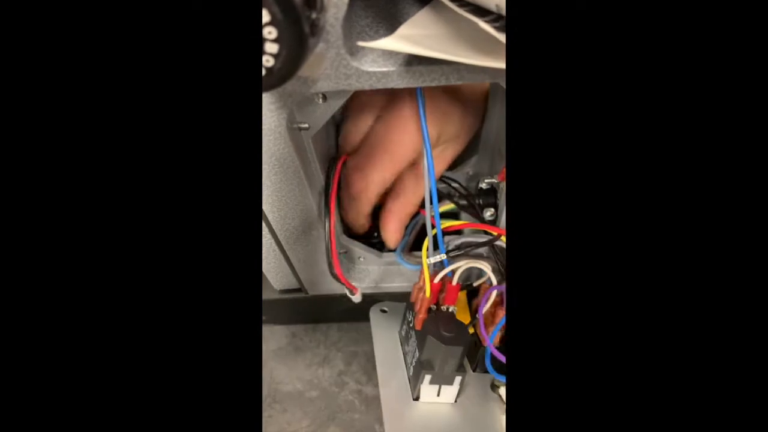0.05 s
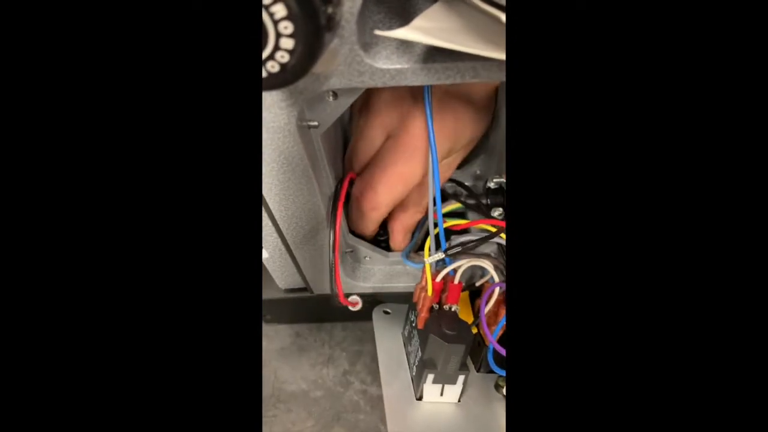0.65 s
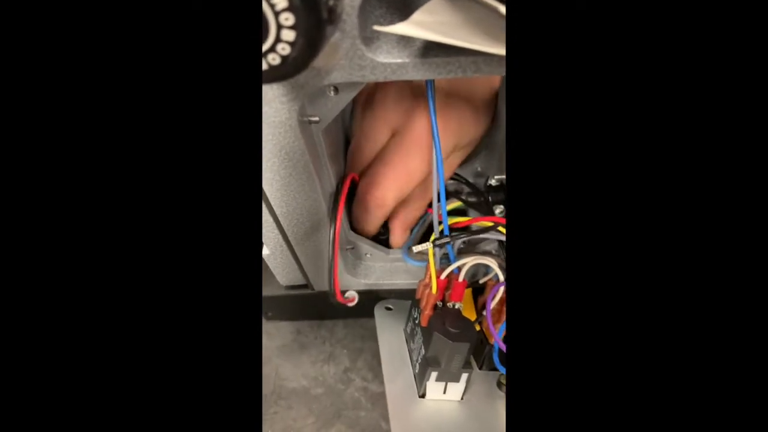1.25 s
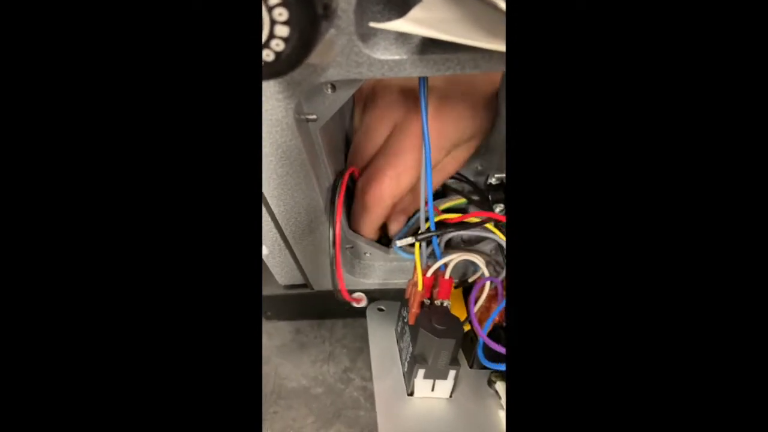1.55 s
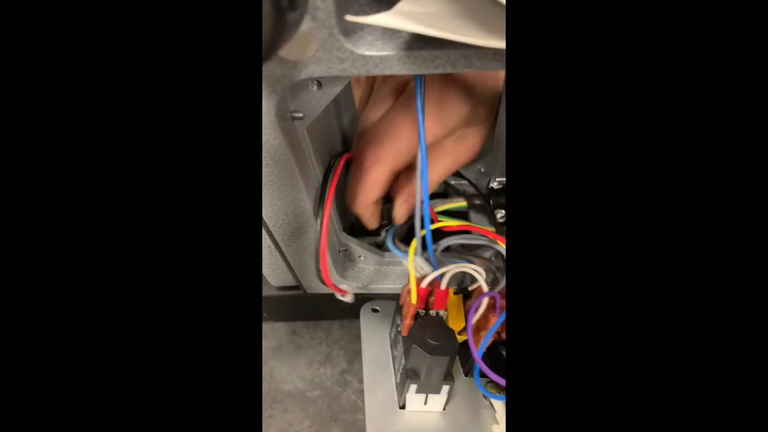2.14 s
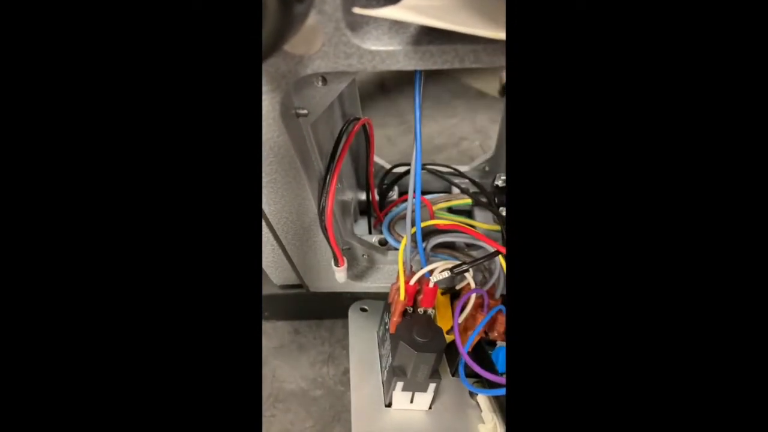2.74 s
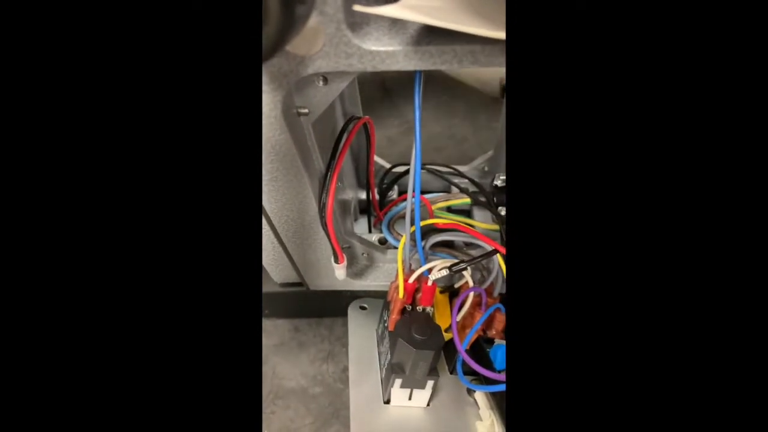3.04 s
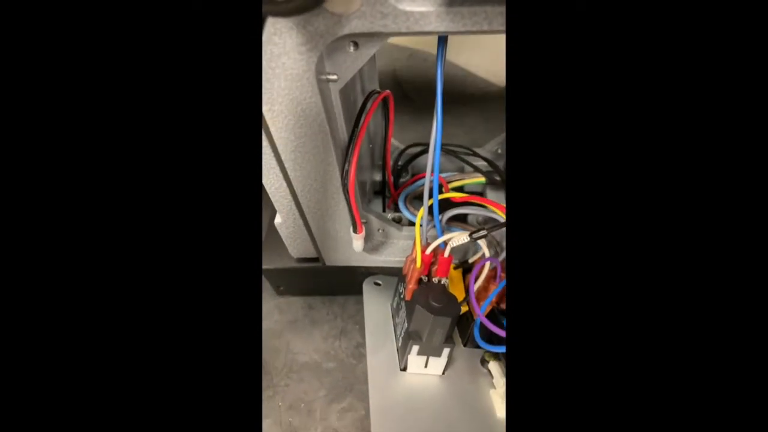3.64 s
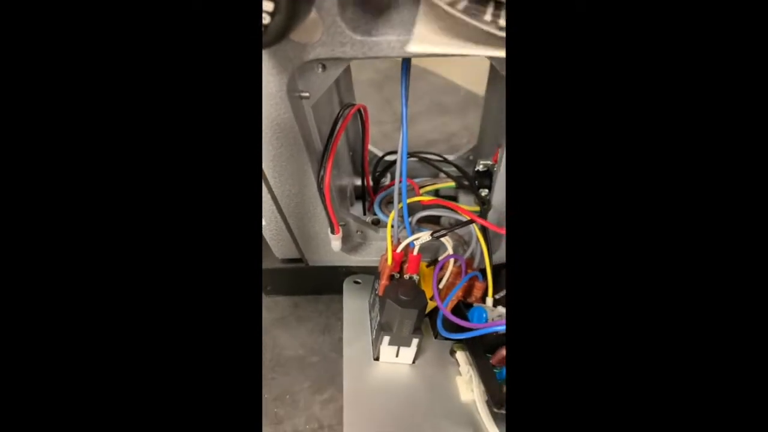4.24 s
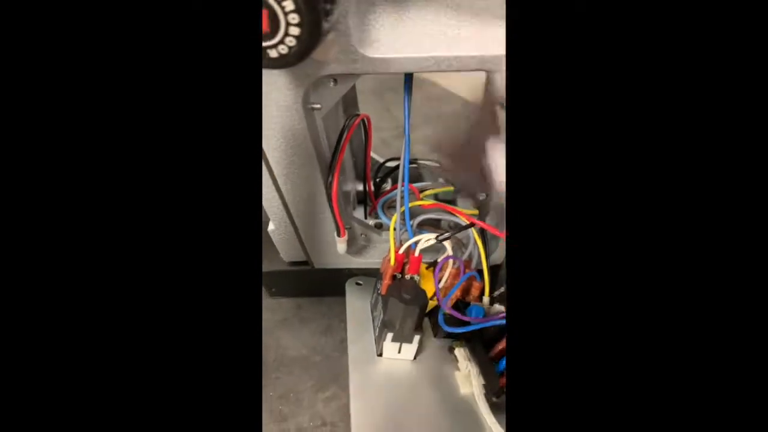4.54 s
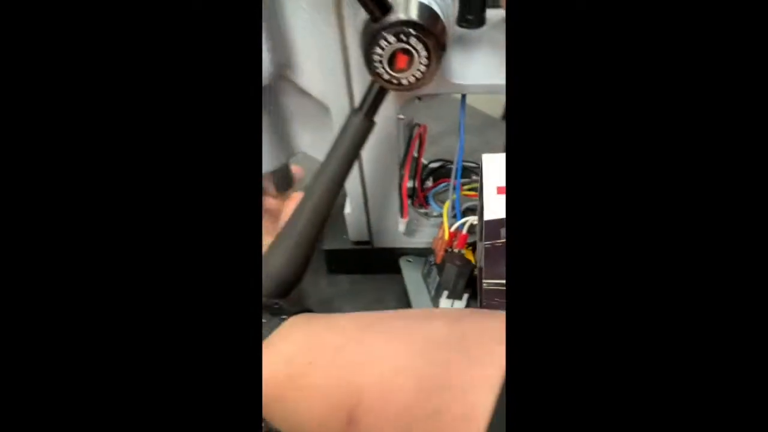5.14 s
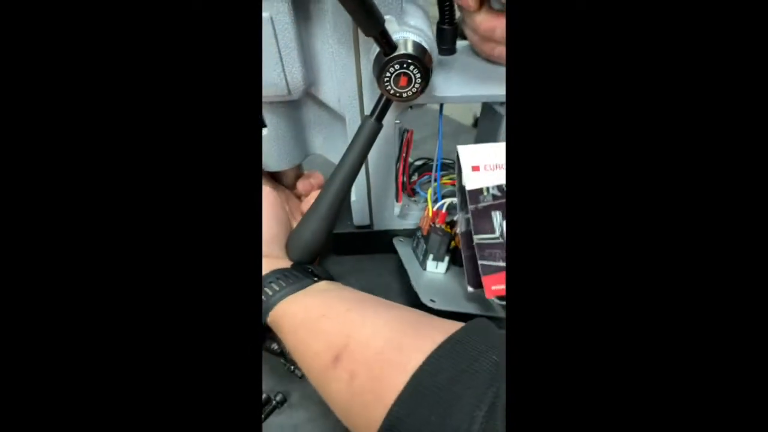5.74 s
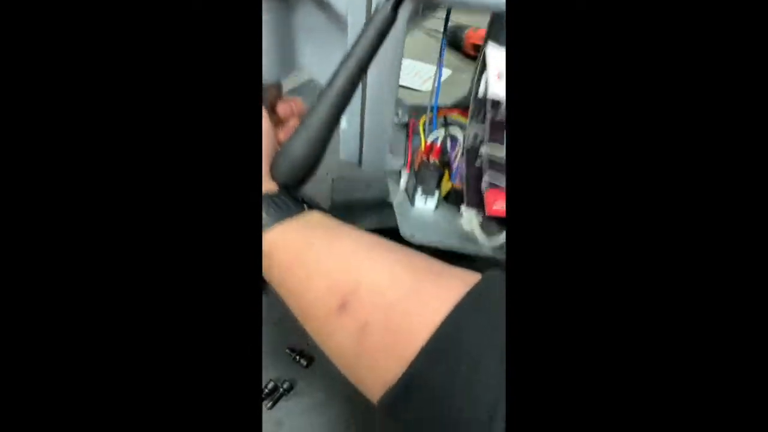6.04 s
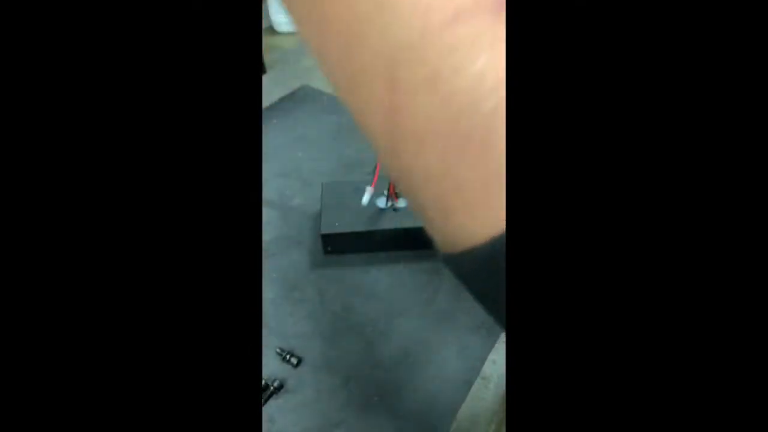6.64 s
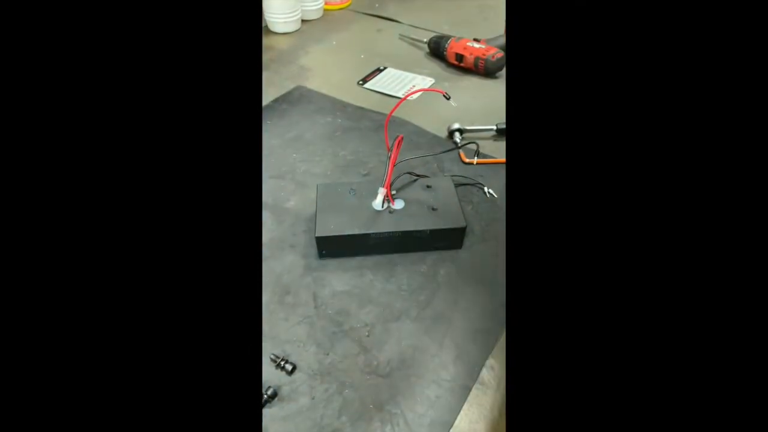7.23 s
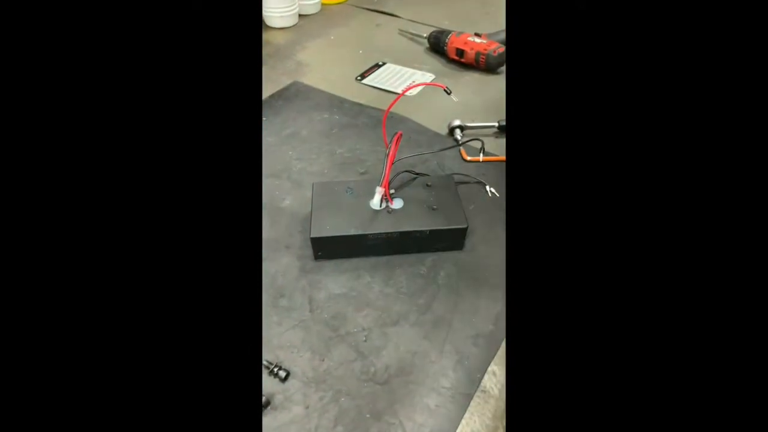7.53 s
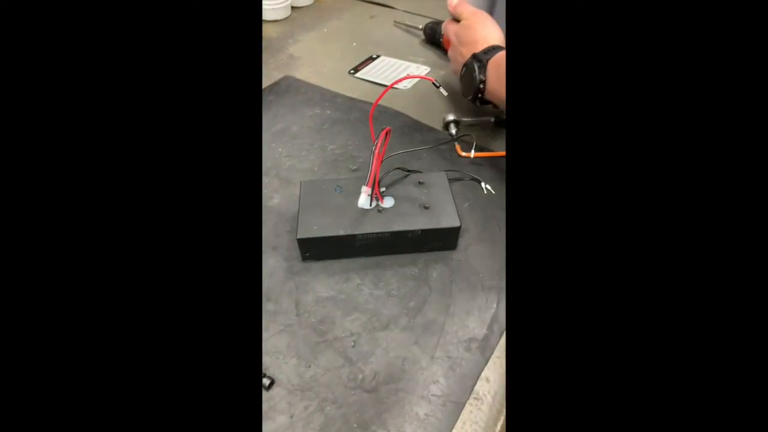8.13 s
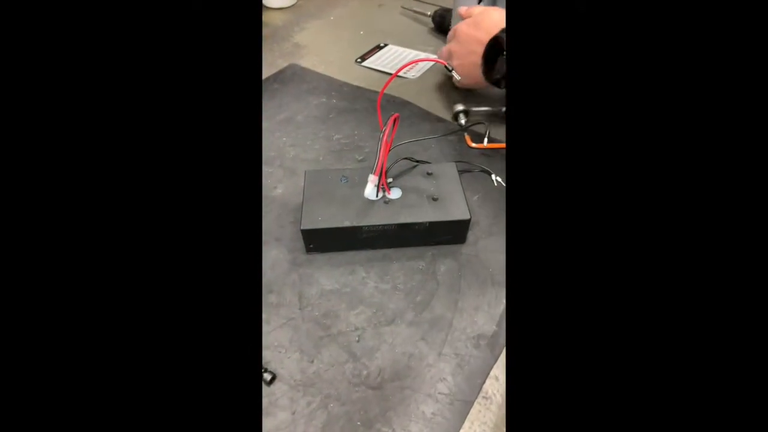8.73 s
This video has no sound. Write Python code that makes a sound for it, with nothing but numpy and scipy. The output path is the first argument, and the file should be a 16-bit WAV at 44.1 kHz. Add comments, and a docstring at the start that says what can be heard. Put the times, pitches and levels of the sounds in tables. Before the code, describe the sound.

Wires rustle and metal connectors click and scrape inside a machine housing, then light taps and a dull thud on a workbench.

```python
"""Wiring inside a machine housing

A hand works wires and connectors close to a pair of microphone ports. Insulation rubs in tiny
stick-slip releases, terminals click on the casing, and a part scrapes as it is lifted away, ringing
the cavity. Then things are put down on a matted workbench with a few taps and a dull thud.
The workshop's ventilation hums throughout."""
import sys
import numpy as np
from scipy import signal
from scipy.fft import rfft, irfft, next_fast_len
from scipy.io import wavfile
from scipy.ndimage import uniform_filter1d

SR = 44100
rng = np.random.default_rng(int(sys.argv[2]) if len(sys.argv) > 2 else 0)


def unload_audio(sound):
    """Save the sound as a 16-bit wav file, at the path given as the first command line argument."""
    columns = np.transpose(np.atleast_2d(sound))
    # keep every value between -1 and 1, then stretch to whole-number steps
    steps = np.round(np.clip(columns, -1, 1) * 32767)
    wavfile.write(sys.argv[1], SR, steps.astype(np.int16))


N = 396018


def amp(db):
    return 10 ** (np.asarray(db) / 20)


def unit_rms(x):
    return x / np.sqrt(np.mean(x ** 2) + 1e-20)


def along(points, hz):
    """Interpolate (f/Hz, value) points on a log axis."""
    f, v = np.transpose(points)
    return np.interp(np.log(hz + 1), np.log(f + 1), v)


def wobble(knots, size):
    """Random curve through Gaussian knots."""
    points = rng.standard_normal(int(knots) + 2)
    return np.interp(np.linspace(0, knots, size), np.arange(len(points)), points)


def fade(t, t60):
    return np.exp(-np.log(1000) * t / np.maximum(t60, 1e-3))


def add(track, start_s, sound):
    i = max(round(start_s * SR), 0)
    track[..., i:i + sound.shape[-1]] += sound[..., :max(N - i, 0)]


def filtered(x, response):
    """Apply a complex frequency response."""
    size = next_fast_len(N + SR // 2)
    return irfft(rfft(x, size) * response(np.fft.rfftfreq(size, 1 / SR)), size)[..., :N]


def coloured(x, spectrum):
    return unit_rms(filtered(x, lambda hz: amp(along(spectrum, hz))))


def minimum_phase(gain_db):
    """Response that rings only after the blow."""
    cepstrum = irfft(np.log(amp(gain_db)))
    half = cepstrum.shape[-1] // 2
    cepstrum[..., 1:half] *= 2
    cepstrum[..., half + 1:] = 0
    return np.exp(rfft(cepstrum))


def narrow_noise(centre_hz, width_hz):
    """Noise in one resonance with a moving centre."""
    wander = filtered(rng.standard_normal((2, N)), lambda hz: 1 / (1 + (hz / width_hz) ** 2))
    phase = 2 * np.pi * np.cumsum(centre_hz * np.ones(N)) / SR
    return unit_rms(wander[0] * np.cos(phase) + wander[1] * np.sin(phase))


def stick_slip(per_s, spread_db, clump_db):
    """Tiny releases of uneven size, bunched over a few milliseconds."""
    slips = (rng.random(N) < per_s / SR) * rng.choice([-1, 1], N)
    sizes_db = spread_db * np.clip(rng.standard_normal(N), -2, 2)
    return slips * amp(sizes_db + clump_db * np.clip(wobble(170 * N / SR, N), -2, 2))


def wandering(x, depth_db):
    """The colour shifts as the contact point moves."""
    frames = signal.stft(x, nperseg=256)[2]
    drift = uniform_filter1d(rng.standard_normal(frames.shape), size=3, axis=0)
    drift = uniform_filter1d(drift, size=24, axis=1)
    return unit_rms(signal.istft(frames * amp(depth_db * unit_rms(drift)), nperseg=256)[1][:N])


def stroke(start_s, length_s, attack_s, t60_s, swell_db=0):
    """Gain of one movement: takes hold, swells or eases, dies away."""
    t = np.maximum(np.arange(N) / SR - start_s, 0)
    swell = amp(swell_db * (np.minimum(t / length_s, 1) - .5))
    return (1 - np.exp(-(t / attack_s) ** 2)) * swell * fade(np.clip(t - length_s, 0, 2), t60_s)


# left minus right: f/Hz, phase/rad
PORT_PHASE = [(0, 0), (600, -0.5), (1400, -0.2), (2600, 1.1), (3800, 1.8), (4600, 3.0), (6800, 6.3),
              (9000, 9.5), (11200, 12.7), (13200, 15.8), (15000, 18.8), (16500, 18.8)]
# left minus right: f/Hz, level/dB
PORT_BALANCE = [(60, -1), (110, 1), (200, 0), (380, -2.5), (700, -5), (1290, -0.5), (2380, -2.5), (4400, 0),
                (8120, -0.5), (15000, 0.5)]

def ports(x):
    """Mono to stereo: level and phase differ between the two ports."""
    def response(hz):
        half_db = along(PORT_BALANCE, hz) / 2
        half_rad = np.interp(hz, *np.transpose(PORT_PHASE)) / 2
        return np.array([amp(half_db) * np.exp(1j * half_rad), amp(-half_db) * np.exp(-1j * half_rad)])
    return filtered(x, response)


# rumble spectrum: f/Hz, level/dB
HUM_SPECTRUM = [(15, -17.5), (30, -5), (50, 2), (70, -1.5), (87, 8.5), (115, -11.5), (150, -18.5),
                (200, -9), (300, -20), (600, -45), (2000, -59)]
# hiss spectrum: f/Hz, level/dB
HISS_SPECTRUM = [(60, 2.5), (200, 7), (400, 4.5), (700, -1.5), (1400, -4), (2200, -7), (2650, -12),
                 (3300, -7.5), (4500, -16), (6300, -14), (8500, -23.5), (11500, -19), (16000, -24.5)]
# hiss envelope: t/s, relative level/dB
HISS_LEVELS = [(0, -70), (2.2, -61.5), (2.35, -74), (2.93, -71), (3.099, -67.5), (5.2, -60.5), (7.398, -64),
               (8.2, -64), (8.98, -58.5)]
# narrow hiss band: t/s, level/dB, f/Hz
HISS_BAND = [(2.3, -94.5, 1886), (2.85, -100, 1957), (3.15, -79, 1960), (3.55, -86, 1982),
             (3.801, -75.5, 2002), (5.2, -73.5, 1937), (6.8, -78.5, 2186), (7.35, -77, 2140),
             (8.1, -76, 2164), (8.9, -72.5, 2117)]

def ventilation():
    """Rumble alike in both ports, hiss from ahead and all round, a faint band that comes and goes."""
    t = np.arange(N) / SR
    hum = amp(-55) * coloured(rng.standard_normal(N), HUM_SPECTRUM) * amp(0.57 * wobble(6 * N / SR, N))
    hiss_gain = amp(np.interp(t, *np.transpose(HISS_LEVELS)))
    ahead, around = np.split(hiss_gain * coloured(rng.standard_normal((3, N)), HISS_SPECTRUM), [1])
    times, db, hz = np.transpose(HISS_BAND)
    band = narrow_noise(np.interp(t, times, hz), width_hz=190)
    band *= amp(np.interp(t, times, db) + 2.5 * wobble(7 * N / SR, N))
    return hum + amp(-2.5) * around + ports(amp(-5.5) * ahead + band)


# workshop and casing decay: f/Hz, t60/s
ROOM_DECAY = [(100, 1), (500, 0.47), (2500, 0.44), (7000, 0.1), (16000, 0.19)]
CASING_DECAY = [(200, 0.087), (2500, 0.099), (6000, 0.018)]

def echoes(x, decay, delay_s):
    """Diffuse tail, its bass common to both ports."""
    hz, t, noise = signal.stft(rng.standard_normal((2, SR // 2)), SR, nperseg=256)
    apart = np.clip(hz / 900, 0, 1)[:, None] * np.pi / 4
    frames = np.cos(apart) * noise[0] + np.sin(apart) * np.array([noise[1], -noise[1]])
    tail = signal.istft(frames * fade(t, along(decay, hz)[:, None]), SR, nperseg=256)[1]
    late = np.pad(x, (int(delay_s * SR), 0))
    return signal.fftconvolve(late[None], tail / np.linalg.norm(tail[0]), axes=1)[:, :N]


# scuff spectrum: f/Hz, level/dB
SHUFFLE_SPECTRUM = [(150, -8), (600, 2), (1400, 0.5), (2400, -16), (4000, -29), (10000, -32)]

def shuffle():
    """One dull scuff further back in the workshop."""
    grit = coloured(stick_slip(2500, spread_db=6, clump_db=2.5), SHUFFLE_SPECTRUM)
    return amp(-54) * stroke(start_s=2.957, length_s=0.0045, attack_s=0.0045, t60_s=0.24) * grit


# sleeve passes: t/s, length/s, level/dB, swell/dB
SLEEVE_PASSES = [(4.803, 0.033, -60, 0), (4.942, .065, -62, -4), (5.126, .1, -61, 7), (5.244, .18, -62, 8),
                 (6.665, .06, -52, -9), (8.564, .4, -65, 4)]
# cloth spectrum: f/Hz, level/dB
CLOTH_SPECTRUM = [(1000, -14), (2200, -4.5), (4000, -4.5), (5200, 0), (6200, 4), (7200, -13.5), (9000, -18),
                  (12000, -18), (15500, -18), (16500, -29)]

def sleeve():
    """Cloth brushes past the ports with a soft hiss."""
    effort = sum(amp(db) * stroke(s, length_s, attack_s=0.016, t60_s=.15, swell_db=swell_db)
                 for s, length_s, db, swell_db in SLEEVE_PASSES)
    return effort * wandering(coloured(rng.standard_normal(N), CLOTH_SPECTRUM), depth_db=3)


# bumps on housing and bench: t/s, level/dB, f/Hz, t60/s, overtones/dB
BUMPS = [(1.385, -29.5, 134.6, 0.071, -12), (3.306, -23, 199.5, 0.27, -17.5), (3.312, -32.5, 96, 0.33, -17),
         (3.391, -39.5, 245, 0.32, -17.5), (3.456, -33, 196.3, 0.2, -8), (3.476, -25, 150.3, 0.089, 1.5),
         (3.521, -43.5, 217.6, 0.38, -6.5), (4.2122, -16.5, 392, 0.03, -8),
         (4.219, -24.5, 99.4, 0.098, -19), (4.88, -40, 132.7, 0.13, -14), (6.188, -39, 100.3, 0.079, -18.5),
         (7.869, -31.5, 254, 0.13, -7), (8.055, -27.5, 157.5, 0.1, -12), (8.11, -20, 89, 0.079, -18),
         (8.327, -11, 69, 0.16, -7)]
# panel modes: f ratio, level/dB, t60 ratio, multiplier of overtones/dB
PANEL_MODES = [(.49, -16, 1.6, 1.5), (0.999, 1, 1, 0.02), (1.73, -1.5, .56, 1.1), (3.302, -21.5, .8, 0.59)]

def thuds(rise_cycles=0.65):
    """A soft bump swings a panel for a few uneven cycles; heavier, lower panels start more slowly."""
    out, t = np.zeros(N), np.arange(SR) / SR
    for s, db, hz, t60, overtones_db in BUMPS:
        rise = 1 - np.exp(-(t * hz / rise_cycles) ** 2)
        for ratio, mode_db, t60_ratio, overtone_scale in PANEL_MODES:
            swing = np.sin(2 * np.pi * ratio * hz * t + wobble(91, SR))
            gain = amp(db + mode_db + overtone_scale * overtones_db)
            add(out, s, gain * swing * fade(t, t60_ratio * t60) * rise)
    return out


def chirp(start_hz, end_hz, t60_s, glide_s=0.0034):
    """Bending waves carry the highs ahead of the lows."""
    t = np.arange(SR // 8) / SR
    phase = 2 * np.pi * np.cumsum(end_hz + (start_hz - end_hz) * np.exp(-t / glide_s)) / SR
    return np.sin(phase) * fade(t, t60_s) * (1 - np.exp(-t / glide_s))


def creak(start_s=1.7462, first_gap_s=.0157, gap_ratio=.89, first_db=-39.5, loss_db=0.9):
    """A strained wire slips six times, ever faster and weaker."""
    out = np.zeros(N)
    slip = chirp(start_hz=2600, end_hz=330, t60_s=.021, glide_s=.0019)
    for k in range(6):
        s = start_s + first_gap_s * (1 - gap_ratio ** k) / (1 - gap_ratio)
        add(out, s, amp(first_db - loss_db * k) * slip)
    return out


# sheet flicks: t/s, level/dB, start f/Hz, end f/Hz, t60/s
SHEET_FLICKS = [(1.715, -40.5, 1230, 248, 0.0089), (4.0142, -17.5, 1830, 310, 0.011),
                (4.8796, -25, 1670, 256, 0.01), (5.8872, -21, 990, 880, 0.028),
                (5.9035, -29, 900, 400, 0.016), (5.9335, -31.5, 890, 227, 0.071),
                (6.9103, -32, 900, 263, 0.077), (6.9733, -27, 993, 242, 0.07),
                (7.0583, -37, 778, 245, 0.14), (7.672, -43.5, 1190, 402, 0.058)]

def flicks():
    """Each flick on a flexible sheet is a falling chirp."""
    out = np.zeros(N)
    for s, db, start_hz, end_hz, t60 in SHEET_FLICKS:
        add(out, s, amp(db) * chirp(start_hz, end_hz, t60))
    return out


# housing cavity: f/Hz, width/Hz, level/dB
CAVITY_MODES = [(1035, 140, 4), (1300, 270, -3), (1600, 420, -1), (2010, 160, -17), (2720, 300, -13),
                (3340, 410, -18)]

def cavity(x):
    """The housing's hollow resonates in modes of alternating sign."""
    def response(hz):
        return sum((-1) ** k * amp(db) * 1j * hz * width / (centre ** 2 - hz ** 2 + 1j * hz * width)
                   for k, (centre, width, db) in enumerate(CAVITY_MODES))
    return unit_rms(filtered(x, response))


# wire strokes: t/s, length/s, level/dB, drag offset/dB, fizz offset/dB, swell/dB
WIRE_STROKES = [(0, 0.122, -60.5, -8, -3.5, -10), (0.13, 0.071, -58, -1, -3.5, -2),
                (0.229, 0.042, -63, -0.5, 0, 5.5), (0.31, 0.035, -62.5, -15, -7.5, 0),
                (0.461, 0.054, -60.5, -1.5, -3.5, -5), (0.595, .07, -66, 4, -3, -2),
                (0.664, 0.024, -59.5, -4, -3.5, 14.5), (0.729, 0.09, -65.5, -5, -5, -4),
                (0.903, 0.18, -67, -6, -5.5, 5), (1.082, 0.066, -47.5, -20, -3.5, 0),
                (1.157, 0.056, -64, -11, -18, 2.5), (1.256, 0.16, -60, -13.5, -9, -0.5),
                (1.375, 0.056, -54, 4, 5, -3), (1.44, 0.04, -60.5, -3, 8, 0),
                (1.489, .1, -51.5, -10, -3.5, 4), (1.623, 0.086, -62.5, 5, 3.5, 0),
                (1.72, 0.11, -70, 10, -8.5, 4), (1.857, 0.0488, -55.5, -1, -1, 0.5),
                (1.957, .015, -58, -6, -2, 0), (1.988, 0.05, -46, -6, 1, 7.5),
                (2.124, 0.12, -53.5, -2.5, -1.5, -5), (3.963, .085, -55.5, -6, 0, 6.5),
                (4.055, 0.21, -47, -4.5, 2.5, 4.5), (4.2, 0.024, -28.5, -15, -2, 0),
                (4.265, 0.067, -54, -10.5, 2.5, -12.5), (4.34, 0.16, -57, -1, 6.5, 5.5),
                (4.466, .2, -52.5, -2.5, 2.5, 2.5), (4.507, 0.023, -48, -8, 6.5, 6),
                (4.593, .035, -42.5, -16.5, 4.5, -0.5), (4.684, 0.19, -68, -12.5, 1, 10.5),
                (4.881, 0.026, -67, 14.5, 16, -1), (5.431, 0.069, -56.5, 2, 0.5, -0.5),
                (5.85, 0.22, -50, 0, 2, -1.5), (6.062, 0.098, -39, -5, -4, -3),
                (6.161, 0.105, -40.5, -4, -1, 6.5), (6.283, .09, -51, -3, 3.5, 1.5),
                (6.332, 0.024, -43, -8, -3, -1), (6.413, 0.098, -55.5, 2, -4, 0),
                (6.549, .09, -57.5, -10, -2, -9), (6.65, 0.059, -55, -7, -21, -13)]
# friction spectra, low to high: f/Hz, level/dB
DRAG_SPECTRUM = [(40, -29.5), (130, 4), (250, 4), (500, -7), (900, -13), (2000, -38)]
RUB_SPECTRUM = [(300, -29), (750, -8.5), (1020, -6.5), (1300, -4.5), (1600, 0.5), (2100, 1), (2800, -1),
                (3800, -7.5), (7000, -37)]
FIZZ_SPECTRUM = [(1500, -32), (3500, 4), (5000, 4.5), (6400, 6), (7500, -0.5), (8700, -1.5), (11000, -1.5),
                 (13500, -6), (15300, -5.5), (16300, -28.5)]

def rubbing(hand_out_s=2.6):
    """Insulation drags over casing and wires: low drag, papery rub, fine fizz, stray ticks."""
    power = np.zeros((3, N))
    for s, length_s, db, drag_db, fizz_db, swell_db in WIRE_STROKES:
        effort = stroke(s, length_s, attack_s=0.0079, t60_s=0.15, swell_db=swell_db)
        power += np.outer(amp([db + drag_db, db, db + fizz_db]) ** 2, effort ** 2)
    drag_gain, rub_gain, fizz_gain = np.sqrt(power)
    # the cavity rings less once the hand has left it
    cavity_share = np.where(np.arange(N) / SR < hand_out_s, 0.48, 0.11)
    hollow = cavity(stick_slip(1400, spread_db=2.5, clump_db=5))
    papery = coloured(stick_slip(2000, spread_db=2, clump_db=3.5), RUB_SPECTRUM)
    rasp = np.sqrt(cavity_share) * hollow + np.sqrt(1 - cavity_share) * papery
    crackle = stick_slip(3200, spread_db=2.5, clump_db=2.5)
    ticks = stick_slip(77, spread_db=3, clump_db=1)
    drag = coloured(stick_slip(900, spread_db=0.5, clump_db=4), DRAG_SPECTRUM)
    rub = wandering(rasp + amp(-11) * coloured(ticks, RUB_SPECTRUM), depth_db=4.5)
    fizz = wandering(coloured(unit_rms(crackle) + amp(-9) * unit_rms(ticks), FIZZ_SPECTRUM), depth_db=4)
    return drag_gain * drag + rub_gain * rub + fizz_gain * fizz


# part sliding on the housing: t/s, length/s, attack/s, level/dB, fizz offset/dB, note offset/dB
SLIDES = [(2.03, .018, .008, -41, -12.5, -17), (2.078, .026, .007, -46, -9, -9),
          (2.148, .085, .015, -51, -8.5, -20), (5.409, .068, 0.031, -45.5, -6, -15),
          (5.7, .065, 0.045, -31.5, -12, -11), (5.772, .072, .012, -32, -4, -3.5),
          (6.078, .025, 0.0072, -40.5, -8, -16), (6.163, .02, 0.0073, -43, -8, -16),
          (6.354, .014, .006, -43, -12, -9)]

def scrape(edge_hz=1660, edge_sag_hz_per_s=5200, note_hz=1030, note_sag_hz_per_s=400):
    """A sliding edge judders and rings the cavity; its own resonance and the cavity's note sink."""
    bite_s, t60_s = 0.0053, .11  # the edge bites: fizz and note swell and outlast the rasp
    rasp_gain, fizz_gain, note_gain, slid_s = np.zeros((4, N))
    t = np.arange(N) / SR
    for s, length_s, attack_s, db, fizz_db, note_db in SLIDES:
        rasp_gain += amp(db) * stroke(s, length_s, attack_s, t60_s)
        fizz_gain += amp(db + fizz_db) * stroke(s, length_s + bite_s, attack_s, t60_s, swell_db=2.5)
        note_gain += amp(db + note_db) * stroke(s, length_s + bite_s, attack_s, t60_s, swell_db=3.5)
        slid_s = np.where(t < s, slid_s, np.minimum(t - s, length_s))
    slips = stick_slip(2400, spread_db=-1.5, clump_db=1.5)
    edge = narrow_noise(edge_hz - edge_sag_hz_per_s * slid_s, width_hz=220)
    rasp = amp(-6) * cavity(slips) + amp(-7) * edge
    fizz = wandering(coloured(slips, FIZZ_SPECTRUM), depth_db=4)
    phase = 2 * np.pi * np.cumsum(note_hz - note_sag_hz_per_s * slid_s) / SR
    phase += .7 * wobble(110 * N / SR, N)
    note = unit_rms(np.sin(phase) * amp(3 * wobble(90 * N / SR, N)))
    return rasp_gain * rasp + note_gain * note + fizz_gain * fizz


# ringing small parts, and the housing cavity at 2.141 s: peak t/s, level/dB, f/Hz, t60/s, swell/s
PART_RINGS = [(1.128, -32.5, 4760, .03, .0005), (1.574, -34.5, 4960, 0.048, .0005),
              (1.976, -32.5, 3720, .07, .0005), (2.005, -35.5, 3795, .05, .0005),
              (2.016, -28, 3704, .04, 0.00046), (2.141, -33, 1022, .08, 0.0011),
              (3.434, -58, 10130, 0.16, .002), (3.486, -50, 10420, 0.11, 0.0014),
              (4.198, -29.5, 2040, 0.056, 0.018), (4.214, -17, 2014, 0.052, 0.00071),
              (4.214, -28, 546, 0.095, .001), (4.217, -24.5, 2233, 0.06, 0.0011),
              (4.232, -19.5, 2300, 0.051, .001), (6.133, -19.5, 6644, 0.022, .001),
              (6.1912, -23, 1613, 0.021, 0.00051), (6.662, -25, 5800, 0.033, .0005),
              (6.664, -38, 2372, 0.13, .002), (8.053, -35, 1900, 0.036, .0005),
              (8.055, -43.5, 524, 0.087, 0.00079), (8.158, -37, 1960, .05, .0005)]

def rings(jitter_rad=0.94):
    lead = SR // 10
    out, t = np.zeros(N), np.arange(-lead, SR // 4) / SR
    for s, db, hz, t60, swell_s in PART_RINGS:
        envelope = np.exp(np.minimum(t, 0) / swell_s) * fade(np.maximum(t, 0), t60)
        add(out, s, amp(db) * envelope * np.sin(2 * np.pi * hz * t + jitter_rad * wobble(90, len(t))))
    return np.roll(out, -lead)


# terminal jerks: t/s, level/dB, t60/s
TERMINAL_JERKS = [(2.003, -23, .011), (2.0098, -26, .011), (2.0155, -21, .02), (2.062, -36, .012)]
# tick spectrum: f/Hz, level/dB
JERK_SPECTRUM = [(6000, -40), (9500, -24), (11500, -7), (13000, -9), (14400, 0), (15600, 0), (16500, -10)]

def jerks():
    """A spade terminal jerks off its tab; its tiny metal leaves tick in the top treble."""
    t = np.arange(N) / SR
    envelope = sum(amp(db) * (t >= s) * fade(np.maximum(t - s, 0), t60) for s, db, t60 in TERMINAL_JERKS)
    return envelope * coloured(rng.standard_normal(N), JERK_SPECTRUM)


# contact spectra, low to high: f/Hz, level/dB
KNOCK_SPECTRUM = [(30, -19), (100, -3), (200, 0), (400, -1), (700, -7), (1200, -13), (3000, -62.5)]
CRACK_SPECTRUM = [(1000, -42.5), (2600, -8.5), (3500, 0.5), (5000, 5), (6500, 3.5), (7400, -2.5),
                  (9000, -15), (14000, -68.5)]
SPARKLE_SPECTRUM = [(4000, -45.5), (7000, -2.5), (8400, 0), (10500, 1), (12000, -2.5), (13500, -4),
                    (15300, -4), (16300, -26.5)]

def contacts(rows, body_spectrum, sparkle_db, knock_ring_s, body_ring_s, ripple_db, rise_s,
             scuff_t60_s, catch_db, snap_db):
    """Each contact scuffs, snaps, then chatters, ringing the struck body and the small part."""
    size, lead = 8192, 600
    out, hz = np.zeros((2, N)), np.fft.rfftfreq(size, 1 / SR)
    t = (np.arange(size) - lead) / SR
    after = np.maximum(t, 0)
    scuff = amp(-16.5) * fade(np.abs(t), scuff_t60_s)
    treble = hz / (hz + 1200)
    norm = np.sqrt(2 * .005 * SR)  # level = energy spread over 5 ms in each port
    spectra = (KNOCK_SPECTRUM, body_spectrum, CRACK_SPECTRUM, SPARKLE_SPECTRUM)
    for s, level_db, knock_db, crack_db, t60 in rows:
        # a harder contact reaches higher
        levels_db = level_db + np.array([knock_db, 0, crack_db, sparkle_db + 0.99 * crack_db])
        snap = amp(snap_db) * fade(after, 0.24 * t60)
        # each part rings differently and reaches each port differently
        resonances_db = ripple_db * wobble(90, len(hz)) * treble
        resonances_db = resonances_db + np.outer([1, -1], 1.5 * wobble(30, len(hz)) * treble)
        catches = amp(catch_db * np.clip(wobble(250, size), -2, 2) * (1 - fade(after, t60=0.0081)))
        for db, spectrum, ring_s in zip(levels_db, spectra, (knock_ring_s, body_ring_s, 0, 0)):
            blow = (snap + fade(after, t60 + ring_s)) * (1 - np.exp(-after / rise_s))
            chatter = rng.standard_normal(size) * catches * (scuff + blow)
            sound = irfft(rfft(chatter) * minimum_phase(along(spectrum, hz) + resonances_db))
            add(out, s + t[0], amp(db) * norm * sound / np.linalg.norm(sound))
    return out


def tool_rattle(start_s=7.8672, gap_s=.0036, first_db=-40.5, loss_db=1):
    """Contact rows for a tool settling in a fast run of fading taps."""
    knock_db, crack_db, t60_s = 7.5, -16.5, 0.0044
    return [(start_s + k * gap_s, first_db - loss_db * k, knock_db, crack_db, t60_s) for k in range(16)]


# bench contacts, opening with one sharp click at 6.66 s: t/s, level/dB, knock offset/dB, # crack offset/dB,
# base t60/s
BENCH_TAPS = [(6.6607, -32.5, -13.5, 6.5, 0.032), (6.8318, -45.5, -3.5, -1, 0.12),
              (6.9112, -47.5, 6, -6, 0.23), (6.9752, -58.5, 21, -13.5, 0.11),
              (7.0597, -63, 17.5, -10, 0.15), (7.6702, -47, 7, -6.5, 0.26),
              (7.7647, -62.5, 23, -22.5, 0.11), (7.8645, -38.5, 2, -2.5, 0.13),
              (7.8956, -42.5, -3, -12, 0.41), (7.9165, -47.5, -0.5, -12, 0.24),
              (8.0519, -34.5, -5, -4, 0.016), (8.1085, -51, 9, 4, 0.13), (8.147, -50, 9, -12, .04),
              (8.1568, -38.5, 4, -0.5, 0.052), (8.165, -39.5, -6, 4.5, 0.041), (8.2267, -62.5, 6, 12, 0.11),
              (8.342, -46, 10.5, -8, 0.57), (8.613, -54, 4.5, -19, 0.042)]
# bench body: f/Hz, level/dB
BENCH_SPECTRUM = [(200, -47), (650, -16.5), (1000, -9.5), (1500, 1), (2100, 1), (2800, -3), (3600, -5.5),
                  (7000, -50)]

def bench_taps():
    """Things land on the matted bench with a soft onset."""
    return contacts(BENCH_TAPS + tool_rattle(), BENCH_SPECTRUM, sparkle_db=-10,
                    knock_ring_s=0.015, body_ring_s=0.006, ripple_db=5.5, rise_s=0.00052,
                    scuff_t60_s=0.034, catch_db=4, snap_db=0)


# housing contacts: t/s, level/dB, knock offset/dB, crack offset/dB, base t60/s
TERMINAL_CLICKS = [(0.0524, -62.5, -12, -7, .015), (0.2534, -62, -10, 0, .015),
                   (0.4156, -66, -16, -1, 0.047), (0.4744, -61, -13, -2, .015),
                   (0.5258, -52.5, -7, -10, 0.12), (0.5931, -53, -1.5, -10, 0.028),
                   (0.6157, -60.5, -4, 7, 0.038), (0.6716, -43.5, -20, 4.5, 0.021),
                   (0.692, -48.5, -8.5, -14.5, .03), (0.7639, -57.5, -8, 3, 0.036),
                   (0.9012, -59.5, -15.5, -2.5, 0.038), (0.9748, -58.5, -10.5, -1.5, .014),
                   (1.0206, -58.5, -10, 14, 0.014), (1.0541, -58, -10, -6, .012),
                   (1.0854, -42, -24.5, 0, 0.009), (1.114, -39.5, -31.5, -5.5, 0.008),
                   (1.1272, -38.5, -25, 2, 0.009), (1.143, -39.5, -24, -13, 0.027),
                   (1.156, -45.5, -25.5, -7.5, .014), (1.2766, -58.5, -15.5, -11, .015),
                   (1.3856, -56, 10, 15.5, 0.015), (1.4091, -42.5, -13.5, 18, 0.009),
                   (1.4517, -55.5, -13, 6, .012), (1.5174, -44.5, -24, -13, .02),
                   (1.5734, -41.5, -13.5, 7, .011), (1.6186, -57, -3.5, 8, .016),
                   (1.7001, -57, -7, -4, .03), (1.8452, -48, -6, -2, 0.045), (1.8781, -48.5, -1, 11, 0.013),
                   (1.975, -43, -6.5, 11, 0.0051), (1.9877, -47.5, -1, 17.5, 0.014),
                   (1.9966, -50, -6, 16.5, .02), (2.0035, -46, -13.5, 15.5, 0.015),
                   (2.0101, -49, -10.5, 17.5, .011), (2.0157, -41, -5.5, 15.5, 0.022),
                   (2.0623, -58, -3.5, 19.5, 0.013), (2.1399, -35, -14, -11.5, 0.036),
                   (2.8144, -59.5, 5, -7.5, 0.027), (3.0957, -51.5, 1.5, -1.5, 0.0097),
                   (3.2823, -65, 21, 7.5, 0.086), (3.4321, -48.5, 2.5, -3.5, 0.1),
                   (3.4839, -57, 16, -13, 0.053), (3.64, -54.5, -4.5, -4, 0.021),
                   (4.0146, -48, 9, -1.5, 0.025), (4.0849, -48.5, -6.5, 9.5, 0.14),
                   (4.1301, -35, -16, -6, 0.048), (4.1372, -28.5, -4.5, 0, 0.034),
                   (4.188, -29.5, -8.5, -4, 0.12), (4.2125, -26.5, -6, 8.5, 0.01),
                   (4.2143, -17, -7, -3.5, 0.014), (4.2183, -29.5, -7, 3, .01),
                   (4.2311, -19.5, -8.5, -2.5, 0.025), (4.2357, -29, -7.5, 5.5, 0.014),
                   (4.2485, -29.5, -9, 4.5, 0.071), (4.3605, -43.5, -30, -10, 0.19),
                   (4.382, -51.5, -15, 11.5, 0.048), (4.5155, -45, -2, 12.5, .04),
                   (4.5205, -43.5, -2, 15.5, .03), (4.5348, -41.5, 5, 8, 0.014),
                   (4.5697, -26.5, -14.5, 3, 0.014), (4.5992, -46.5, -6, 10.5, 0.027),
                   (4.6072, -30.5, -12, 4, 0.038), (4.6186, -35.5, -22, 0, .047),
                   (4.6535, -46, 10.5, 0, .05), (4.6696, -43, -3.5, 4, 0.045),
                   (4.6745, -42.5, -13, 3, 0.014), (4.7513, -52.5, -11, -21.5, 0.022),
                   (4.8806, -54.5, 7, 7, 0.087), (5.876, -42.5, 1.5, 9.5, .015),
                   (5.8912, -43, -4.5, 9, 0.02), (5.9036, -47.5, 0, 11, .016),
                   (5.9194, -50.5, -11, 15, 0.018), (5.9812, -37, -22.5, 12, 0.01),
                   (6.0407, -49.5, 10.5, 12, 0.024), (6.0885, -38, 5.5, 5.5, 0.084),
                   (6.1195, -35.5, 7.5, 1.5, .04), (6.1305, -23.5, -18.5, 9, 0.021),
                   (6.1435, -35.5, -14.5, 2, 0.04), (6.1906, -28, -2.5, -2, 0.017),
                   (6.2183, -41, -12.5, 17, .018), (6.2252, -43.5, -8.5, 17, .009),
                   (6.229, -32.5, -4, 9.5, 0.018), (6.2605, -39, -7, 1, .015),
                   (6.3305, -43.5, -9, -0.5, .015), (6.339, -38, -7.5, 1.5, 0.011),
                   (6.3443, -39.5, -11, 9, .014), (6.3751, -40.5, -4, -3, 0.012),
                   (6.4158, -38.5, -6, 0.5, 0.15), (6.5193, -40, -25, -3.5, 0.11),
                   (6.5405, -49, -3, -2, .02), (6.5782, -56.5, 5, 8, .04), (6.5915, -56.5, -6, 0.5, .02)]
# housing body: f/Hz, level/dB
HOUSING_SPECTRUM = [(200, -47.5), (650, -17.5), (1000, -7), (1400, -3), (2100, 3), (2800, -5.5), (3600, -6),
                    (7000, -53.5)]

def terminal_clicks():
    """Terminals and wires strike the housing with a sharp snap."""
    return contacts(TERMINAL_CLICKS, HOUSING_SPECTRUM, sparkle_db=-2,
                    knock_ring_s=0.047, body_ring_s=0.02, ripple_db=7, rise_s=0.00012,
                    scuff_t60_s=0.018, catch_db=6, snap_db=4.5)


def scene():
    """Handling near the ports, the bench further off; casing and workshop echo both."""
    clicks, taps = terminal_clicks(), bench_taps()
    near = clicks + jerks() + rings() + rubbing() + scrape() + sleeve() + flicks() + creak()
    far = taps + shuffle()
    bumps = thuds()
    casing = amp(-18) * echoes(np.mean(near + far, axis=0), CASING_DECAY, delay_s=.0003)
    room_send = amp(-27.5) * near + amp(-11) * far + amp(-16.5) * bumps
    room = echoes(np.mean(room_send, axis=0), ROOM_DECAY, delay_s=0.0089)
    return ports(near + far + bumps) + casing + room + ventilation()


def record(dry, ceiling=.85, low_cut_hz=32, top_hz=16700):
    """Soft peak limit, low cut, band limit."""
    rounded = dry / (1 + (dry / ceiling) ** 6) ** (1 / 6)
    return filtered(rounded, lambda hz: (1j * hz / (low_cut_hz + 1j * hz)) ** 2 * (hz < top_hz))


dry = scene()
out = record(dry)
unload_audio(out)
```